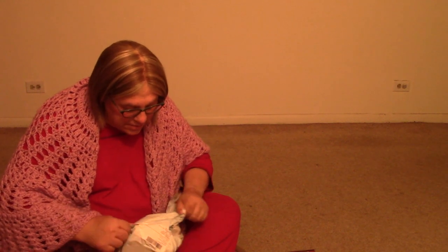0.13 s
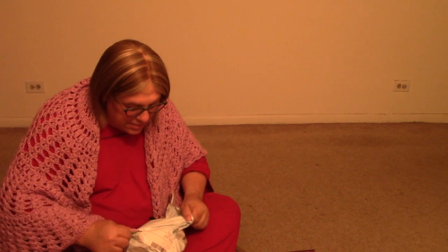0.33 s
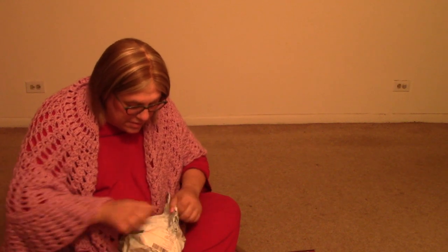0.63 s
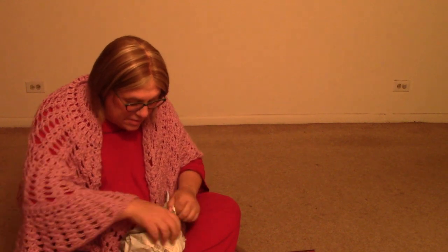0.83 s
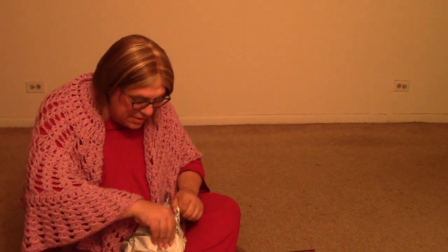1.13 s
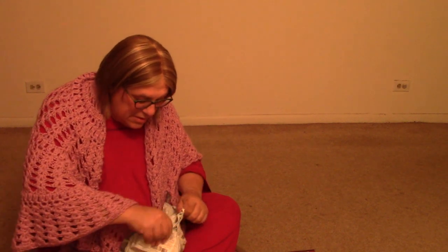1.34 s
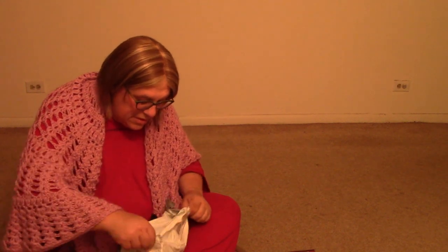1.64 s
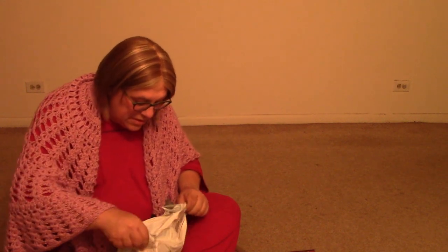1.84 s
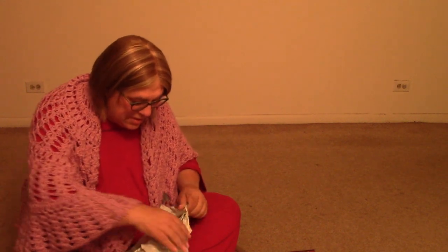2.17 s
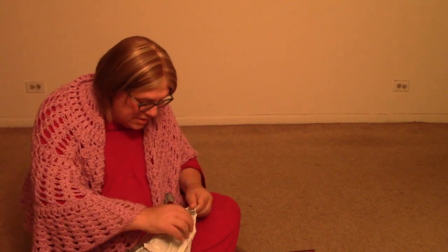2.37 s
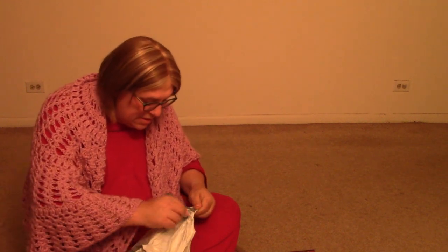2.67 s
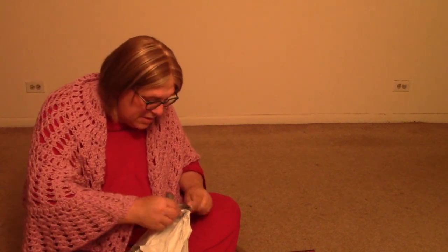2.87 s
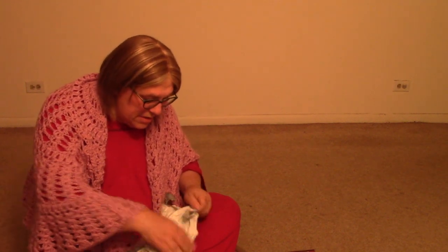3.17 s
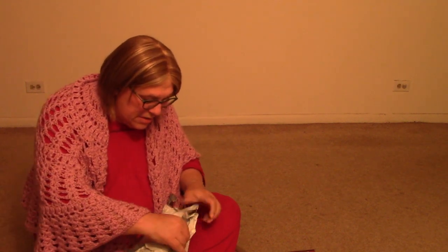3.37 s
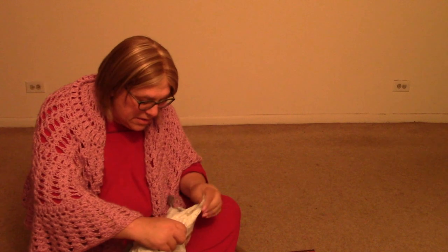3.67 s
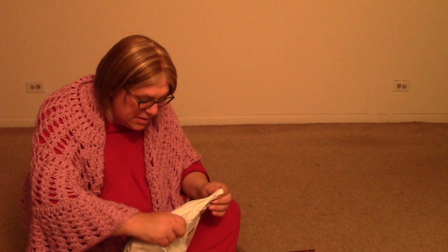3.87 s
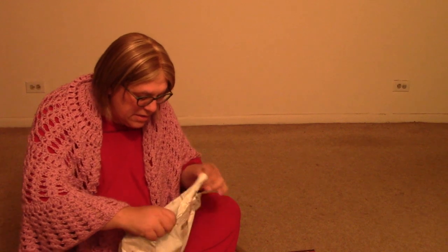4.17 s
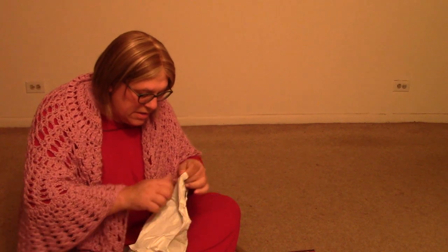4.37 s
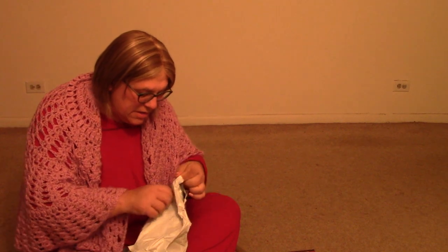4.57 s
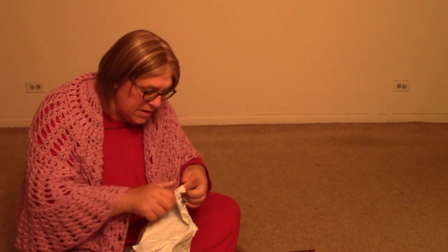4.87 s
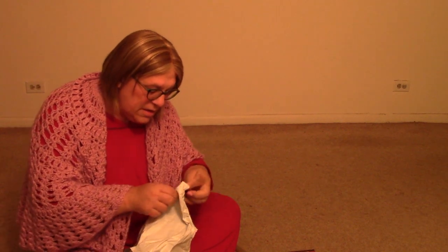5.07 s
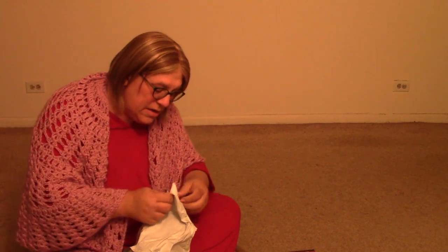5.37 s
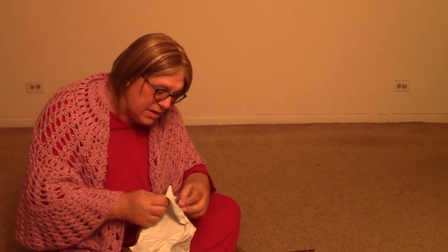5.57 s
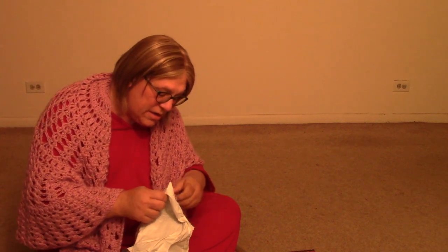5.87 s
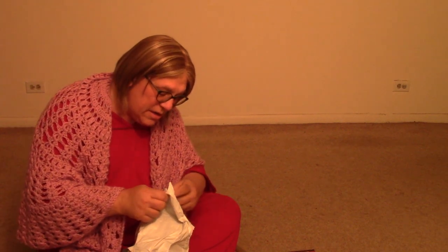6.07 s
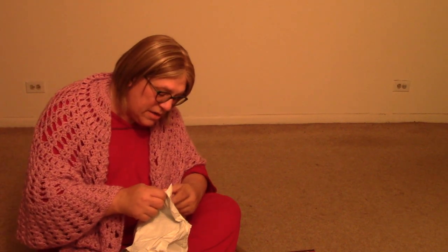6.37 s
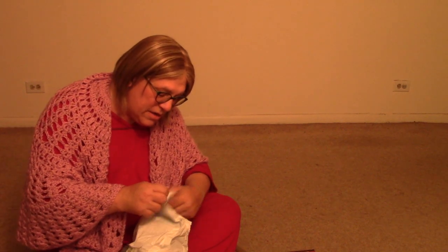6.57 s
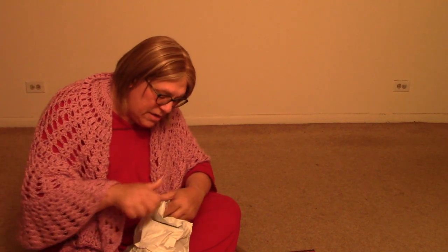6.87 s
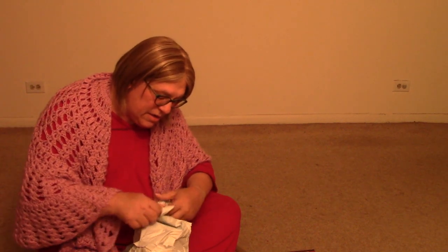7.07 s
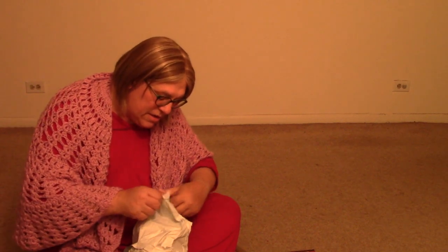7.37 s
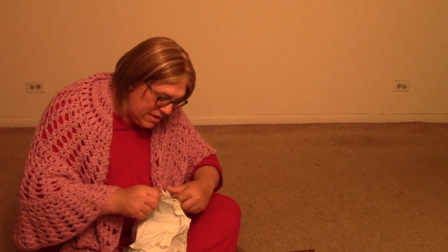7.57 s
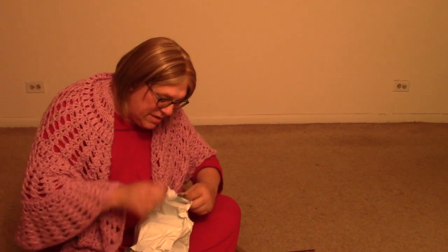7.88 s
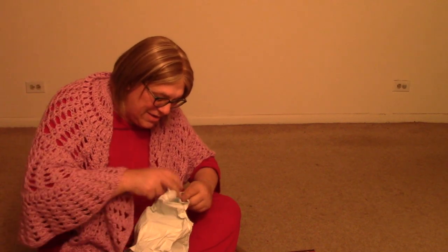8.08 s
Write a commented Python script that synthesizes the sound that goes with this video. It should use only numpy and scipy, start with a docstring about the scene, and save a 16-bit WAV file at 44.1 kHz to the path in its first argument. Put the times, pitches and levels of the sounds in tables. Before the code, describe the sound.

A thin plastic mailing bag crackles and snaps under handling hands in a quiet carpeted room, over a low electrical hum.

```python
"""A thin plastic mailing bag is pulled and crumpled by hand, close up in a dry, carpeted room.
Creases buckle with short snaps, singly or in dense crackle: bursts of noise ring panels of many sizes.
The flexing sheet pushes low puffs of air (shaped noise), and whole panels thump (short swings of pressure).
A mains hum of three sines and a dull room tone of filtered noise lie below.
Both grow louder for most of the scene, then dip and waver a little."""
import sys
import numpy as np
from scipy import signal
from scipy.fft import rfft, irfft
from scipy.io import wavfile
from scipy.ndimage import uniform_filter1d

SR = 44100
rng = np.random.default_rng(int(sys.argv[2]) if len(sys.argv) > 2 else 0)


def log_audio(samples):
    """Write samples as a 16-bit WAV file to the path given in sys.argv[1]."""
    # one column per channel
    frames = np.atleast_2d(samples).T
    # limit to full scale, then quantise
    limited = np.clip(frames, -1, 1)
    pcm = np.round(limited * 32767).astype(np.int16)
    wavfile.write(sys.argv[1], SR, pcm)


N = 362061   # length [samples]


def amp(db):
    """Turn decibels into a gain."""
    return 10 ** (np.asarray(db) / 20)


def rms_one(x):
    """Scale a sound to an average (rms) level of 1."""
    return x / np.sqrt(np.mean(x ** 2) + 1e-20)


def in_time(rows):
    """Join the points of each table column with straight lines, one value per sample."""
    times, *columns = np.transpose(rows)
    t = np.arange(N) / SR
    return [np.interp(t, times, column) for column in columns]


def colour(x, spectrum):
    """Filter a sound to a table of (frequency [Hz], gain [dB]), with no sound ahead of its cause."""
    size = 8192
    hz = np.maximum(np.arange(size // 2 + 1) * SR / size, 1)
    points = np.array(spectrum)
    gain_db = np.interp(np.log(hz), np.log(points[:, 0]), points[:, 1])
    # folding the cepstrum gives the minimum-phase filter: its energy comes as early as possible
    cepstrum = irfft(np.log(amp(gain_db)))
    cepstrum[1:size // 2] *= 2
    cepstrum[size // 2 + 1:] = 0
    response = irfft(np.exp(rfft(cepstrum)))
    return signal.fftconvolve(x, response)[:len(x)]


def drift(rate_hz):
    """Wander slowly and randomly around zero with a spread of 1."""
    step = 40   # samples between the drawn points
    r = np.exp(-2 * step * np.pi * rate_hz / SR)
    noise = rng.standard_normal(N // step + 2002)
    slow = signal.lfilter([1], [1, -2 * r, r * r], noise)[2000:]   # skip the filter's start
    return np.interp(np.arange(N) / step, np.arange(len(slow)), rms_one(slow))


def resonance(x, hz, width_hz):
    """Ring at one pitch, as a two-pole peak with a gain of about 1 on top."""
    r = np.exp(-np.pi * width_hz / SR)
    top = (1 - r * r) / 2
    return signal.lfilter([top, 0, -top], [1, -2 * r * np.cos(2 * np.pi * hz / SR), r * r], x)


def split(x, hz, kind):
    """Keep the part below ("low") or above ("high") a frequency, with a steep edge."""
    return signal.sosfilt(signal.butter(4, hz, kind, fs=SR, output="sos"), x)


def bursts(clicks, decay_s):
    """Let each click open a burst of noise that swells briefly and dies."""
    r = np.exp(-1 / (max(decay_s, 1e-4) * SR))
    swell = signal.lfilter([1], [1, -2 * r, r * r], clicks)
    return swell * rng.standard_normal(len(clicks))


def even(x, seconds):
    """Divide a sound by its own level over a window, so that it stays near 1."""
    return x / np.sqrt(uniform_filter1d(x ** 2, int(seconds * SR)) + 1e-12)


# Swells of handling noise; neighbouring rows may overlap to shape one longer pull or tear:
# (time of peak [s], crackle level [dB], rise [s], fall [s],
# sizzle level above crackle [dB], flexing level above crackle [dB])
HANDLING_SWELLS = [(0.09, -13, 1, 0.035, -8.5, 0.5), (0.135, -28, 0.12, 0.008, -16, 6),
                   (0.24, -28.5, 0.12, 0.27, -11.5, 0), (0.615, -31, 0.46, 0.29, -11, 0.5),
                   (0.951, -36, 0.098, 0.12, -11, 5), (1.103, -25.5, 0.054, 0.12, -18, -1.5),
                   (1.309, -30, 0.32, 0.24, -18, 3), (1.538, -12, 0.15, 0.09, -11, 1.3),
                   (1.593, -19.5, 0.19, 0.014, -1, -0.5), (1.66, -26, 0.041, 0.15, -3.5, 3),
                   (1.95, -38, 0.715, 0.4, -4.5, 2), (2.084, -25.5, 0.042, 0.13, -12.5, 2.5),
                   (2.25, -38, 0.07, 0.14, -9, -1), (2.349, -37.5, 0.038, 0.38, -12, 10.5),
                   (2.58, -28.5, 0.085, 0.16, -8.5, -4), (2.745, -28, 0.035, 0.21, -7.5, 2.5),
                   (2.871, -25.5, 0.04, 0.27, -10, -2.5), (3.04, -29.5, 0.13, 0.16, -13, 4),
                   (3.225, -30, 0.22, 0.19, -16, 2), (3.33, -21, 0.15, 0.16, -9, 2.5),
                   (3.559, -23.5, 0.063, 0.083, -19, 4), (3.689, -21.5, 0.36, 0.31, -11.5, 1.5),
                   (3.835, -15.5, 0.15, 0.033, -3.5, 4.5), (3.92, -31, 0.14, 0.19, -6, 7.5),
                   (4.076, -25.5, 0.12, 0.055, -7, 5.5), (4.164, -14.5, 0.015, 0.018, -7.5, 7.5),
                   (4.334, -21.5, 0.26, 0.36, -6, 4.5), (4.583, -23.5, 0.011, 0.054, 6.5, 1.5),
                   (4.895, -29.5, 0.098, 0.023, -24, 4), (5.039, -22.5, 0.24, 0.14, -5.5, -1.5),
                   (5.184, -34.5, 1, 0.56, -7.5, 4), (5.47, -25.5, 0.15, 0.21, -11, 2),
                   (5.78, -57, 0.14, 0.1, -17, 12), (5.992, -21.5, 0.23, 0.063, -11, 5.5),
                   (6.197, -30, 0.44, 0.041, -7.5, 3), (6.306, -21, 0.064, 0.029, -5, 4.5),
                   (6.375, -19, 0.036, 0.088, -9.5, 1.5), (6.49, -27, 0.06, 0.029, -6, 6),
                   (6.635, -12, 0.074, 0.2, -8.5, -4), (6.69, -13, 0.059, 0.14, -11.5, 2.5),
                   (6.761, -18.5, 0.2, 0.092, -11, 11.5), (6.859, -19, 0.15, 0.094, -9, 2.5),
                   (7.005, -45, 0.51, 0.035, -27, 17.5), (7.11, -21, 0.065, 0.45, -8, 2.5),
                   (7.258, -25, 0.52, 0.03, -9, 8), (7.34, -19.5, 0.059, 0.32, -7.5, 6),
                   (7.467, -13, 0.13, 0.25, -8.5, -1), (7.591, -23, 0.013, 0.93, -26, 8),
                   (7.746, -10.5, 0.069, 0.071, -6, 4.5), (7.976, -14, 0.075, 0.034, -5.5, 4.5),
                   (8.087, -30.5, 0.31, 0.024, -8, 11.5), (8.161, -22.5, 0.042, 1, -6.5, 1)]
SWING_DB = 20   # a swell climbs this far over its rise and sinks this far over its fall
REST_CRACKLE_DB, REST_SIZZLE_DB, REST_FLEX_DB = -65, -87, -49   # the bag held still


def handling():
    """Give crackle, sizzle and flexing levels in dB: the powers of all swells add to the resting bag."""
    t = np.arange(0, N + 32, 32) / SR
    power = np.ones((3, len(t))) * amp([[REST_CRACKLE_DB], [REST_SIZZLE_DB], [REST_FLEX_DB]]) ** 2
    for peak_s, crackle_db, rise_s, fall_s, sizzle_db, flex_db in HANDLING_SWELLS:
        late = t - peak_s
        # rise and fall last at least 10 ms
        drop = np.maximum(-late / max(rise_s, .01), late / max(fall_s, .01))
        crackle_power = amp(crackle_db - SWING_DB * drop) ** 2
        power += crackle_power * amp([[0], [sizzle_db], [flex_db]]) ** 2
    return in_time(np.column_stack([t, *10 * np.log10(power)]))


def bucklings(crackle_db):
    """Buckle at random in clumps, on panels of many sizes; harder handling packs them denser."""
    clumps_db = 4.0 * drift(22) + 3.0 * drift(7)
    per_s = 240.0 * amp(.3 * (crackle_db + 29.5) + clumps_db)
    happens = rng.random(N) < per_s / SR
    sizes = amp(2.8 * np.minimum(rng.exponential(1, N), 4.5)) * happens
    panels_hz = np.geomspace(620, 11000, 12)
    dealt = rng.integers(0, 12, N)   # which panel each buckling falls on
    burst = 0
    for k, hz in enumerate(panels_hz):
        decay_s = 0.00063 * (2000 / hz) ** 0.39   # small panels let go faster
        raw = bursts(sizes * (dealt == k) + 1e-18, decay_s) * 0.0006 / decay_s
        direct = 0.59 * split(raw, min(4.2 * hz, .45 * SR), "low")
        ring = 65.0 / np.sqrt(hz) * resonance(raw, hz, hz * 0.24)
        burst = burst + direct + ring
    return burst


# Tone colour of the crackle, with the top of the treble cut steeply above about 16 kHz:
# (frequency [Hz], gain [dB])
CRACKLE_COLOUR = [(240, -31.5), (400, -0.5), (669, -8.5), (1150, -5.5), (2400, -7), (2800, -6.5),
                  (7460, -7), (13700, -17.5), (15700, -25), (16500, -71)]
# Smooth rustle, high where the film tears or slides, and the crackle's upper middle:
# (time [s], rustle level against the bucklings before random flicker [dB], upper-middle gain [dB])
RUSTLE_LEVELS = [(0.1, 0, 4), (0.2, -7.5, 5.5), (1.4, -2.5, -8.5), (1.55, 10.5, -8), (1.64, -4, -4.5),
                 (6.75, -5.5, -1.5), (6.95, -3.5, -7), (7.2, -2, 0), (7.3, -12, -3)]


def crackle(burst, crackle_db, sizzle_db):
    """Colour the bucklings together with the noisy rustle of the film's sliding faces."""
    rustle_db, upper_db = in_time(RUSTLE_LEVELS)
    hiss = split(rng.standard_normal(N), 12800, "low")
    rustle = amp(rustle_db + 3.8 * drift(62)) * hiss
    coloured = colour(even(burst, 0.12) + rustle, CRACKLE_COLOUR)
    body = split(coloured, 3880, "low")
    sizzle = split(coloured, 5100, "high")
    upper_middle = amp(upper_db) * split(body, 2630, "high")
    body = split(body, 2280, "low") + upper_middle
    return amp(crackle_db) * even(body, 0.09) + amp(sizzle_db) * even(sizzle, 0.125)


# Tone colour of the air puffs: (frequency [Hz], gain [dB])
PUFF_COLOUR = [(12, -27), (20, -2.5), (65, 2.5), (226, -3.5), (276, -4.5), (348, -6.5), (438, -11.5),
               (800, -16.5), (1040, -29), (1760, -120)]


def air_puffs(burst, flex_db):
    """Push air where the sheet buckles: low noise swells with the clumps, with dull bumps among it."""
    clump_power = np.abs(split(even(burst, 0.118) ** 2, 35.0, "low"))
    swell = np.sqrt(clump_power + 1.05) * amp(2.0 * drift(12.0))
    # whole panels pop over at random, about 50 times a second
    pops = 27.5 * rng.standard_normal(N) * (rng.random(N) < 50.0 / SR)
    noise = rng.standard_normal(N) + pops
    return amp(flex_db) * even(colour(swell * noise, PUFF_COLOUR), 0.14)


def bag():
    """Let the same bucklings drive both the crackle and the puffs of air."""
    crackle_db, sizzle_db, flex_db = handling()
    burst = bucklings(crackle_db)
    return crackle(burst, crackle_db, sizzle_db) + air_puffs(burst, flex_db)


# Tones of the mains hum: (frequency [Hz], level before the waver and the background level [dB])
HUM_TONES = [(60, 0.5), (120, -11), (180, -10.5)]


def mains_hum():
    """Add steady electrical tones that waver together in level and phase."""
    t = np.arange(N) / SR
    waver_db = .8 * drift(3)
    wobble = .1 * drift(2)   # phase swing of a 60 Hz tone [radians]
    hum = 0
    for hz, db in HUM_TONES:
        tone = np.sqrt(2) * np.sin(2 * np.pi * hz * t + wobble * hz / 60)
        hum = hum + amp(db + waver_db) * tone
    return hum


# Tone colour of the dull room noise: (frequency [Hz], relative gain [dB])
ROOM_COLOUR = [(20, -8), (65, 4), (228, -14), (357, -10), (678, -32.5), (1530, -30.5), (4540, -80),
               (16000, -52)]


def room_tone():
    """Filter steady random noise into a dull murmur."""
    return amp(-4) * rms_one(colour(rng.standard_normal(N), ROOM_COLOUR))


# Shared loudness of hum and room tone: (time [s], level [dB])
BACKGROUND_LEVEL = [(0.0, -43.5), (2.95, -35.5), (3.16, -33.5), (6.88, -23), (7.22, -26), (7.59, -23),
                    (8.21, -24.5)]


def background():
    """Lay the hum over the room tone, both on one slow level."""
    level_db, = in_time(BACKGROUND_LEVEL)
    return amp(level_db) * (mains_hum() + room_tone())


# A whole panel pops over and pushes air: (time [s], peak level before the low cut [dB], pitch [Hz])
PANEL_THUMPS = [(0.013, -2.5, 256), (1.634, -12.5, 79), (3.0913, -13, 86.5), (3.5003, -6, 355),
                (3.5747, -3.5, 267), (3.828, -11, 149), (4.176, -17, 233), (4.2915, -4, 275),
                (4.338, -10, 111), (6.326, -3, 60.6), (6.404, -3, 146), (7.3398, 1, 132),
                (7.5338, 2.5, 77.5), (7.65, 3.5, 316), (7.773, 0, 117)]
THUMP_CYCLES = 0.37   # time from the peak to where the swing's outline falls to 1/e [cycles]


def thumps():
    """Swing the air pressure softly, about one cycle per thump."""
    out, t = np.zeros(N), np.arange(N) / SR
    for s, peak_db, hz in PANEL_THUMPS:
        near = slice(round((s - 2 / hz) * SR), round((s + 2 / hz) * SR))
        cycles = (t[near] - s) * hz
        outline = np.exp(-(cycles / THUMP_CYCLES) ** 2)
        out[near] += amp(peak_db) * outline * np.cos(2 * np.pi * cycles)
    return split(out, 40, "high")


# Loud single snaps: (time [s], knock peak level [dB], panel pitch [Hz], sizzle level above knock [dB])
CREASE_SNAPS = [(0.462, -14, 2620, -11), (0.7761, -19.5, 2380, -11), (0.928, -21, 3550, -7),
                (0.950, -15.5, 1810, -17), (1.005, -19, 2500, -8), (1.095, -18, 1400, -12),
                (1.201, -16, 1890, -8), (1.2256, -13.5, 1280, -15), (1.300, -16, 1230, -12),
                (1.367, -15, 1430, -26), (1.399, -11, 1010, 1), (1.455, -19, 1120, -5),
                (1.675, -19, 1290, 5), (2.247, -18.5, 2490, -8), (2.344, -12.5, 2000, 0),
                (2.352, -15, 2500, -5), (2.407, -22, 3000, -4), (2.529, -23, 2500, 4),
                (2.733, -9, 2270, -7), (2.7929, -10, 3200, -5), (2.854, -15, 1350, -13),
                (2.916, -16, 2020, 5), (2.9454, -8.5, 1790, -13), (3.028, -15, 1300, -1),
                (3.046, -8, 1280, -17), (3.064, -11, 4300, -5), (3.152, -14, 1230, -12),
                (3.398, -9, 2220, -2), (3.5, -11, 910, -19), (3.571, -6, 2010, -10.5),
                (3.6512, -5.5, 2300, -4), (3.747, -8.5, 2000, -10), (3.796, -2, 900, -3),
                (3.973, -10, 1230, -11), (4.111, -8.5, 1340, -7), (4.2154, -5, 1320, -8),
                (4.252, -23, 4350, 24), (4.3465, -9, 2150, 5), (4.4635, -8.5, 1230, 2),
                (4.55, -14, 1310, -15), (4.5714, -5.5, 990, 0), (4.578, -3, 3970, 8.5),
                (4.7398, -15, 2000, 1), (4.82, -17, 2320, 4), (4.88, -11.5, 1520, 0), (4.976, -8, 1380, -5),
                (5.0492, -11.5, 1420, 7), (5.136, -7.5, 2720, -3), (5.1661, -3.5, 1050, -2.5),
                (5.1978, -11.5, 1870, -10), (5.233, -12, 1240, -24), (5.3327, -16, 3600, -5),
                (5.396, -4, 2800, 1.5), (5.42, -9.5, 1180, -11), (5.4776, -9.5, 3900, -5),
                (5.511, -11, 3270, -13), (5.5316, -5.5, 2580, 1), (5.5836, -10.5, 3500, -8),
                (5.754, -13, 1649, -16), (5.8848, -6.5, 1860, -8), (5.9533, -8.5, 2570, 2.5),
                (6.0002, -9, 2600, 2), (6.0436, -10, 1830, -6), (6.201, -10, 1170, -0.5),
                (6.239, -10, 1640, -8), (6.2983, -5, 4440, 1), (6.362, -9, 1284, -24.5),
                (6.5569, -8.5, 4160, -1.5), (6.623, -2, 4580, -15), (6.744, 4, 2450, -2),
                (6.761, -6, 1890, 7), (6.7814, 4, 2530, -4), (6.8682, 3, 2390, -5), (7.003, -8, 1250, -28),
                (7.014, -16.5, 5320, -18), (7.226, -18, 1360, 10), (7.246, -9.5, 2120, -1),
                (7.2677, -15, 900, 2), (7.3276, -5.5, 3420, -6), (7.3437, -8.5, 2750, 0.5),
                (7.437, -9, 1410, -2), (7.586, -3.5, 2350, 0), (7.601, -3, 1490, -2),
                (7.634, -1, 1290, -14), (7.6464, -0.5, 1320, -27), (7.901, -8, 2180, -0.5),
                (8.0413, -9, 2170, -10), (8.1637, -10, 2570, -21)]


def snaps():
    """Let a crease go: a burst of about a millisecond rings its panel and sizzles on top."""
    size = 800   # samples per snap
    out = np.zeros(N + size)
    t = np.arange(size) / SR
    for s, peak_db, hz, sizzle_db in CREASE_SNAPS:
        low, high = rng.standard_normal((2, size))
        low = low * t * np.exp(-t / 0.00065)
        knock = resonance(low, hz, hz * 0.17) + 0.3 * split(low, 5400, "low")
        sizzle = split(colour(high * np.exp(-t / 0.0007), CRACKLE_COLOUR), 5300, "high")
        sizzle = resonance(sizzle, 9230, 3300)   # the top octave is duller
        knock = knock / np.abs(knock).max()
        sizzle = amp(sizzle_db) * sizzle / np.abs(sizzle).max()
        i = round(s * SR)
        out[i:i + size] += amp(peak_db) * (knock + sizzle)
    return out[:N]


def room(x):
    """Echo from lap, carpet and walls: a short, dull tail of noise follows the sound and dies away."""
    decay_s = .1   # time to fall by 60 dB
    keep = amp(-2 * 60 / (decay_s * SR))   # power kept from one sample to the next
    power = signal.lfilter([1 - keep], [1, -keep], split(x, 400, "high") ** 2)
    tail = rms_one(split(colour(rng.standard_normal(N), CRACKLE_COLOUR), 2580, "low"))
    return amp(-10.0) * np.sqrt(np.maximum(power, 0)) * tail


def scene():
    """Add the bag, its echoes and the background."""
    near = bag() + thumps() + snaps()
    return (near + room(near) + background())[None]


def record(dry):
    """Round the peaks softly and cut the top of the treble."""
    rounded = .85 * np.tanh(dry / .85)
    top_cut = signal.cheby2(16, 80, 16600, fs=SR, output="sos")   # 80 dB down from 16600 Hz
    return signal.sosfilt(top_cut, rounded)


dry = scene()
out = record(dry)
log_audio(out)
```